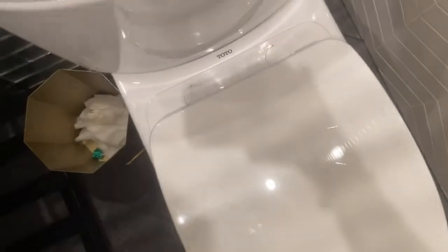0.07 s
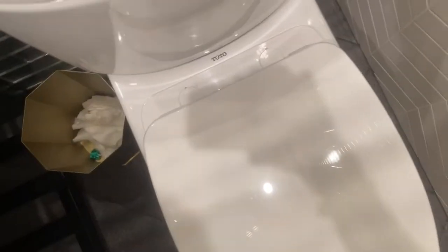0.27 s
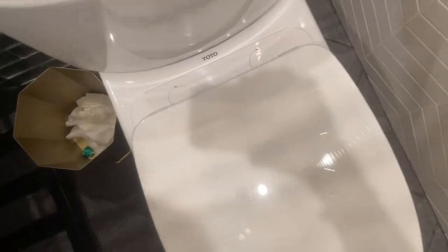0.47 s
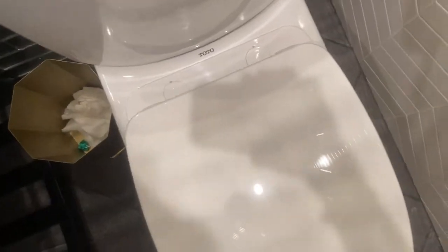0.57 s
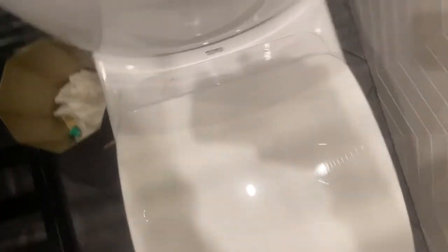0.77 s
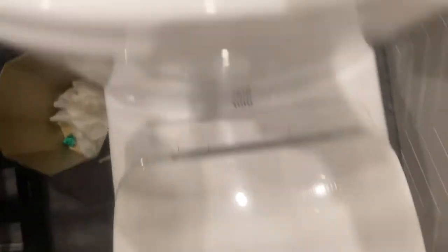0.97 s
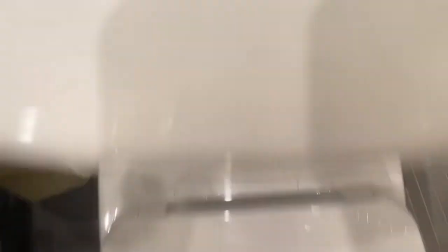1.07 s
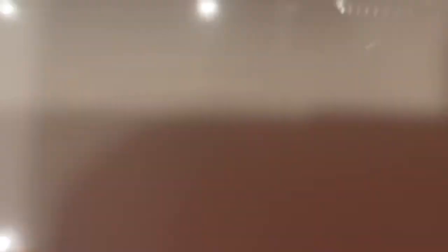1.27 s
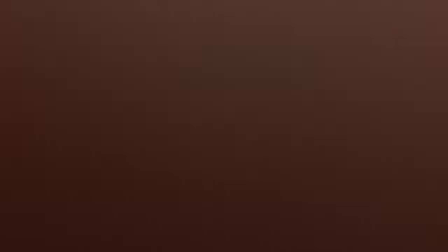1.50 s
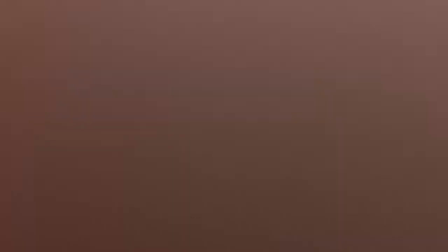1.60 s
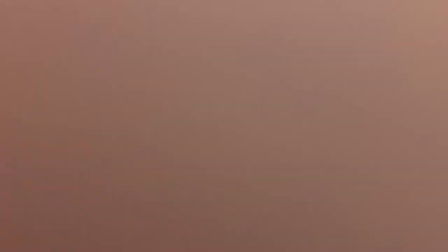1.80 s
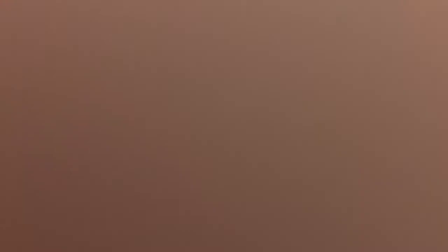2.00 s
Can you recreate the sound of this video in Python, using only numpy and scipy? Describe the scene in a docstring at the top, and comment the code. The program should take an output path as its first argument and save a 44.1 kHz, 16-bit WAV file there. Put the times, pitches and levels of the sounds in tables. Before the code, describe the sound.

A toilet seat bangs onto the bowl at about 0.2 seconds, a sharp crack with a hollow ring dying away in a small tiled bathroom. Faint finger ticks and rustling start around 0.7 seconds, then a light clack and dull lid bumps near 1 second. From 1.4 to 1.6 seconds, fingers scuff and knock sharply against the microphone. A low ventilation rumble runs throughout, dipping briefly after the knocks.

```python
"""A toilet seat bangs down over a low ventilation rumble, and a small tiled bathroom rings.
The seat cracks against the china in quick contacts that set the bowl and the room resonating.
A lighter clack and dull bumps of the lid follow. Close by, fingers tick on the phone, then scuff
and knock on its case and cover the microphone, so that the rumble dips."""
import sys
import numpy as np
from scipy import signal
from scipy.fft import rfft, irfft
from scipy.io import wavfile
from scipy.ndimage import uniform_filter1d, minimum_filter1d

SR = 44100
rng = np.random.default_rng(int(sys.argv[2]) if len(sys.argv) > 2 else 0)


def output_pcm(signal):
    """Save a mono or channel-first signal as 16-bit PCM at the path in sys.argv[1].

    Samples are clipped to [-1, 1] before scaling.
    """
    pcm = np.clip(np.atleast_2d(signal).T, -1, 1) * 32767
    wavfile.write(sys.argv[1], SR, np.round(pcm).astype(np.int16))


N = 90404
CONTACT_RISE_S = 0.00074
ROOM_WIDE_HZ = 400  # the stereo image opens up around here

# The seat hitting the bowl. Each row: start in seconds, relative level in dB.
SEAT_HITS = [(0.2008, -6), (0.2033, 1), (0.2175, -2)]


def undb(db):
    """Decibels to gain."""
    return 10 ** (np.asarray(db) / 20)


def unit(x):
    """Scale to an rms of one."""
    return x / np.sqrt(np.mean(x ** 2))


def along(points, hz):
    """Read a table on a log-frequency axis."""
    p = np.array(points, float)
    return np.interp(np.log(np.maximum(hz, 1)), np.log(p[:, 0]), p[:, 1])


def since(start):
    """Seconds since a moment, zero before it."""
    return np.maximum(np.arange(N) / SR - start, 0)


def ride(points):
    """A fader move: straight lines between points in time."""
    return np.interp(since(0), *np.array(points).T)


def rise(t, seconds):
    """Smooth attack."""
    return 1 - np.exp(-t / seconds)


def fade(t, t60):
    """Exponential decay that starts when t leaves zero."""
    return (t > 0) * np.exp(-np.log(1000) * t / t60)


def wobble(rate):
    """Random values joined by straight lines, so many a second."""
    return np.interp(since(0) * rate, np.arange(1024), rng.standard_normal(1024))


def pan(db):
    """Left and right gains for a level difference."""
    return undb(np.array([[1], [-1]]) * db / 2)


def diffuse(colour):
    """Coloured stereo noise at unit rms, narrow in the bass and wide above."""
    hz = np.fft.rfftfreq(N, 1 / SR)
    mid, side = np.exp(2j * np.pi * rng.random((2, len(hz))))
    side = side * (0.17 + 0.72 * hz ** 2 / (hz ** 2 + ROOM_WIDE_HZ ** 2))
    return unit(irfft(np.array([mid + side, mid - side]) * undb(along(colour, hz)), N))


def click(start, colour, cut_hz, t60):
    """A dry contact of a few milliseconds, duller when it is soft."""
    t = since(start)
    burst = diffuse(colour) * fade(t, t60) * rise(t, CONTACT_RISE_S)
    lowpass = 1 / np.hypot(1, (np.fft.rfftfreq(N, 1 / SR) / cut_hz) ** 2)
    return 2 * irfft(rfft(burst) * lowpass, N)


def ventilation():
    """A bed of low air noise and wavering hum that dips while the microphone is covered."""
    # Moving air as the phone picks it up. Each row: frequency in Hz, relative level in dB.
    air_colour = [(25, -25), (45, -6.5), (70, -5.5), (100, -2.5), (135, -5), (215, -4.5), (285, -16.5),
                  (450, -13), (700, -20), (1000, -28), (1700, -34), (2800, -39), (3800, -47.5),
                  (6000, -50.5), (7500, -68), (13800, -64)]
    # Swell of the hum. Each row: time in seconds, gain in dB.
    hum_swell = [(0, -6), (.16, 6.5), (.6, 0), (.95, 0.5), (1.15, 2.5), (1.4, 0), (1.65, -11), (2.05, -12)]
    # Fader on the whole bed. Each row: time in seconds, gain in dB.
    bed_level = [(0, -0.5), (.15, -0.5), (1.42, 0.5), (1.60, -11.5), (1.74, -7), (1.84, 0), (2.05, -4)]
    hum_gain = undb(-45.5 + ride(hum_swell) + 1.6 * wobble(12))
    hum = hum_gain * np.sin(2 * np.pi * 100.9 * since(0) + 1.2 * wobble(11))
    air = undb(-44.5) * diffuse(air_colour)
    return (air + hum) * undb(ride(bed_level))


def resonances(hz, spacing_hz=14, depth_db=4.8):
    """Gain over frequency of the countless sharp resonances of china and tiles."""
    grid = np.arange(0, SR / 2, spacing_hz)
    ripple = np.interp(hz, grid, rng.standard_normal(len(grid)))
    return undb(depth_db * np.minimum(hz / 900, 1) * ripple)


def in_room(blows, colour, build_s=0.0048):
    """The tiles' answer to blows on one object: a fast bloom, then each band dies at its own rate."""
    # Reverb of the tiles. Each row: band centre in Hz, time to fall 60 dB in seconds.
    bands = [(100, 1.0), (400, 1), (1200, 0.76), (3000, 0.64), (6000, 0.54), (12000, 0.35)]
    hz = np.fft.rfftfreq(N, 1 / SR)
    peaks, out = resonances(hz), 0
    centres, decays = zip(*bands)
    shares = [along(list(zip(centres, row)), hz) for row in np.eye(len(bands))]
    for start, db in blows:
        t = since(start)
        wash = unit(irfft(rfft(diffuse(colour)) * peaks, N))
        spectrum = rfft(wash)
        tail = sum(irfft(spectrum * share, N) * fade(t, t60) for share, t60 in zip(shares, decays))
        out = out + undb(db) * tail * rise(t, build_s)
    return out


def rubbing():
    """Skin drags unevenly over the case between the knocks."""
    # Tone of the rub through the phone's microphone, with a dip near 7.8 kHz.
    # Each row: frequency in Hz, relative level in dB.
    colour = [(300, 9), (2000, 0), (4200, -6), (6400, -6), (7800, -25.5), (11000, -13.5), (14000, -23.5)]
    # Shape of the rub. Each row: time in seconds, level in dB.
    level = [(1.43, -72), (1.447, -52), (1.47, -48), (1.50, -51), (1.525, -54), (1.565, -57), (1.60, -86)]
    return diffuse(colour) * undb(ride(level) + 3.5 * wobble(250))


def fingers():
    """Dry ticks on the phone, and short scuffs that swell into the knocks."""
    # Finger ticks. Each row: start in seconds, relative level in dB, treble cut-off in Hz.
    ticks = [(0.7167, -29.5, 7953), (0.8479, -29, 4010), (0.8792, -31.5, 3040)]
    # A finger sliding on the case. Each row: start in seconds, swell in seconds, peak level in dB.
    scuffs = [(1.434, 0.02, -18), (1.532, 0.015, -38)]
    # Tick and scuff as the phone picks them up. Each row: frequency in Hz, relative level in dB.
    tick_colour = [(150, -23), (800, 3.5), (1750, -1), (2500, -25), (3100, -3), (4200, -15.5), (5800, -10),
                   (9000, -21.5), (15000, -26)]
    scuff_colour = [(100, -24), (450, 2), (900, -20.5), (2500, -21), (6400, -26.5), (7800, -41),
                    (14000, -58.5)]
    out = sum(undb(db) * click(start, tick_colour, cut_hz, t60=0.01) for start, db, cut_hz in ticks)
    for start, swell_s, db in scuffs:
        swell = np.interp(since(start) / swell_s, [0, 1, 1.2], [0, 1, 0])
        out = out + undb(db) * diffuse(scuff_colour) * swell
    return out


def lid():
    """A hand rustles at the lid; light clacks and dull bumps follow, heard through the room."""
    # Shape of the rustle. Each row: time in seconds, level in dB.
    rustle_level = [(.66, -74), (.76, -60), (0.861, -64), (.92, -62), (1.0, -76)]
    # Light and dull hits of the lid. Each row: start in seconds, level in dB.
    clacks = [(.9155, -36.5), (.931, -41.5)]
    bumps = [(.972, -32), (1.075, -41), (1.115, -43)]
    # Tones through the phone's microphone, with a dip near 7.6 kHz in the rustle and clacks.
    # Each row: frequency in Hz, relative level in dB.
    rustle_colour = [(300, -6.5), (1500, 0), (3500, 0.5), (6200, -4.5), (7600, -14.5), (10000, -9.5),
                     (14000, -23)]
    clack_colour = [(100, -26), (400, -9), (800, -3.5), (1400, 2), (1900, -9.5), (2600, -5), (4500, -8.5),
                    (6200, -11.5), (7600, -33), (9500, -11.5), (12500, -23.5), (14500, -40.5)]
    bump_colour = [(40, -24.5), (100, 8.5), (190, -2), (260, -0.5), (380, -18), (1000, -25.5), (4000, -76)]
    rustle = diffuse(rustle_colour) * undb(ride(rustle_level))
    return rustle + in_room(clacks, clack_colour) + in_room(bumps, bump_colour)


def case_ring():
    """The two hard knocks ring the phone's case, with a slight rattle in level and phase."""
    # Case modes. Each row: pitch in Hz, time to fall 60 dB in seconds,
    # relative level in dB at the first hard knock, the same at the second.
    modes = [(1260, 0.22, -58.5, -51), (2068, 0.2, -32.5, -40), (2818, 0.12, -19, -42),
             (2830, 0.37, -49.5, -59.5), (3800, .12, -39, -63), (5690, .1, -52.5, -61),
             (6160, 0.086, -47, -59)]
    # Starts of the hard knocks in seconds.
    hard_knocks = (1.4515, 1.5507)
    out = 0
    for hz, t60, *levels in modes:
        for start, db in zip(hard_knocks, levels):
            t = since(start)
            rattle = 0.11 * wobble(109.4)
            out = out + undb(db) * fade(t, t60) * (1 + rattle) * np.sin(2 * np.pi * hz * t + rattle)
    return out


def knocks():
    """Each knock on the case is a click over a thump that falls fast in pitch; the hard ones ring."""
    # Knocks. Each row: start in seconds, thump level in dB, thump decay in seconds, first and final
    # pitch in Hz, pitch fall in seconds, relative click level in dB, click cut-off in Hz.
    hits = [(1.4482, -12.5, 0.0016, 725, 642, 0.0026, -9.5, 2450),
            (1.4515, -6, 0.006, 844, 42.4, 0.0043, 0, 3000),
            (1.4879, -15, 0.0043, 674, 67.3, .004, -11, 2000),
            (1.5507, -4.5, 0.0035, 620, 205, 0.0021, -6, 8950),
            (1.5547, -19, 0.0054, 122, 65.7, 0.0053, -7, 1460),
            (1.5669, -17, 0.0072, 162, 64.3, 0.0025, -12.5, 1500)]
    # The click through the phone's microphone, with a dip near 7.4 kHz.
    # Each row: frequency in Hz, relative level in dB.
    colour = [(200, -5), (600, 2.5), (1300, -2), (2300, 1), (4200, -26), (5400, -18), (6100, -6.5),
              (7400, -31.5), (10000, -12.5), (12500, -24.5), (14500, -49)]
    stereo_phase = 0.23 * np.array([[1], [-1]])
    thumps, clicks = 0, 0
    for start, db, decay, first_hz, final_hz, fall, click_db, cut_hz in hits:
        t = since(start)
        cycles = final_hz * t + (first_hz - final_hz) * fall * rise(t, fall)
        punch = t / decay * np.exp(1 - t / decay)
        thumps = thumps + undb(db) * punch * np.sin(2 * np.pi * cycles + stereo_phase)
        snap = click(start, colour, cut_hz, t60=0.0059)
        body = undb(-10) * click(start, colour, cut_hz=1320, t60=0.02)
        clicks = clicks + undb(click_db) * (snap + body)
    return thumps + pan(4) * (clicks + case_ring())


def seat_crack(note_hz=394):
    """The attack of the bang: a sharp crack on the china and the seat's short hollow note."""
    # Crack on the china. Each row: frequency in Hz, relative level in dB.
    colour = [(300, -19), (1200, -4), (2200, -5.5), (3500, -1.5), (6000, -10), (12000, -20), (14500, -28)]
    # Hollow thuds at the hard contacts. Each row: start in seconds, relative level in dB.
    thuds = [(0.204, -13), (0.2172, -6.5)]
    out = undb(-25) * diffuse(colour) * fade(since(0.2003), t60=0.037)
    for start, db in thuds:
        t = since(start)
        envelope = rise(t, CONTACT_RISE_S) * fade(t, t60=0.082)
        out = out + undb(db) * envelope * np.sin(2 * np.pi * note_hz * t)
    return pan(9.3) * out


def seat_ring(stereo_radians=0.59):
    """The tail of the bang: seat, bowl and room resonances ring on, and the lowest swell late."""
    # Resonances. Each row: pitch in Hz, relative level in dB, time to fall 60 dB in seconds,
    # build-up in seconds.
    modes = [(196.3, 3.5, 0.86, 0.072), (212.9, -2, 0.83, 0.11), (248.5, -9.5, 1.0, 0.05),
             (322, -9.5, .7, 0.054), (354.7, 0.5, 0.76, 0.0033), (380, -2.5, 0.78, 0.0027),
             (411, -14, 0.78, 0.0084), (433, -11, 0.88, 0.0048), (462, -6, 0.87, .01),
             (539, -7, .85, 0.0033), (634, -13.5, 0.53, 0.012), (739.5, -14.5, 1, 0.0068),
             (1034, -19.5, 1, 0.0048), (1179, -13, 0.32, 0.027), (1530, -15, 0.67, 0.0074),
             (2416, -20, 0.54, 0.0058), (3320, -17, 0.23, 0.0046), (3570, -19, .5, .005),
             (4540, -19.5, 0.25, .005), (5820, -22, .55, .005)]
    t = since(SEAT_HITS[1][0])  # from the hardest hit
    out = 0
    for (hz, db, t60, build), (phase, side) in zip(modes, rng.random((len(modes), 2))):
        width = stereo_radians * min(hz / ROOM_WIDE_HZ, 1.6)
        stereo_phase = np.array([[1], [-1]]) * np.sign(side - 0.5) * width
        tone = np.sin(2 * np.pi * (hz * t + phase) + stereo_phase)
        out = out + undb(db) * rise(t, build) * fade(t, t60) * tone
    return undb(-12.5) * out * pan(6 * fade(t, t60=0.1))  # starts left, settles in the centre


def seat_bang():
    """The body of the bang: the seat slaps the bowl in quick contacts and the room booms."""
    # Tone of the boom and the slap as the phone picks them up, with a dip near 7.6 kHz.
    # Each row: frequency in Hz, relative level in dB.
    boom_colour = [(40, -35), (85, -20), (125, -4.5), (160, -15.5), (270, -13.5), (420, -5.5), (650, -9),
                   (1000, -17.5), (1600, -18), (2600, -20.5), (4500, -27.5), (6400, -28.5), (7600, -59),
                   (9000, -33.5), (12500, -39), (14500, -63)]
    slap_colour = [(60, -37), (250, -1), (420, 3), (700, -12.5), (1200, -30), (2200, -6.5), (4500, -22),
                   (7500, -30), (12000, -22.5), (14500, -29)]
    boom = undb(-19.5) * in_room(SEAT_HITS, boom_colour)
    envelope = 0
    for start, db in SEAT_HITS:
        t = since(start)
        envelope = envelope + undb(db) * rise(t, CONTACT_RISE_S) * fade(t, t60=0.03)
    return boom + undb(-15) * pan(1.6) * diffuse(slap_colour) * envelope


def scene():
    """All sources as they reach the phone."""
    seat = seat_crack() + seat_bang() + seat_ring()
    return seat + lid() + fingers() + rubbing() + knocks() + ventilation()


def record(dry):
    """The phone's limiter holds down the peaks, and the top is cut."""
    ceiling, window_samples, top_hz = 0.93, 89, 13900
    gain = np.minimum(1, ceiling / (np.abs(dry).max(axis=0) + 1e-9))
    gain = uniform_filter1d(minimum_filter1d(gain, window_samples), window_samples)
    lowpass = signal.ellip(8, 0.2, 70, top_hz, fs=SR, output="sos")
    return signal.sosfilt(lowpass, dry * gain)


dry = scene()
out = record(dry)
output_pcm(out)
```